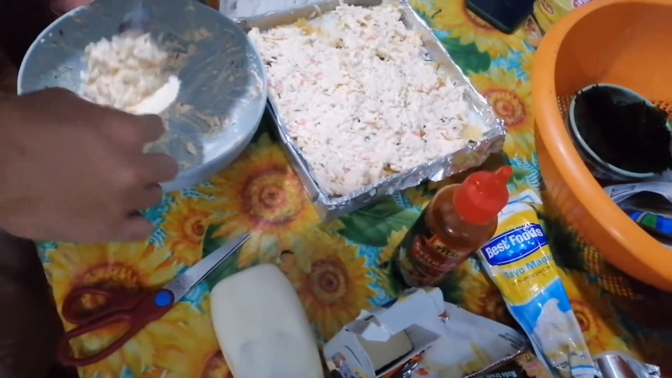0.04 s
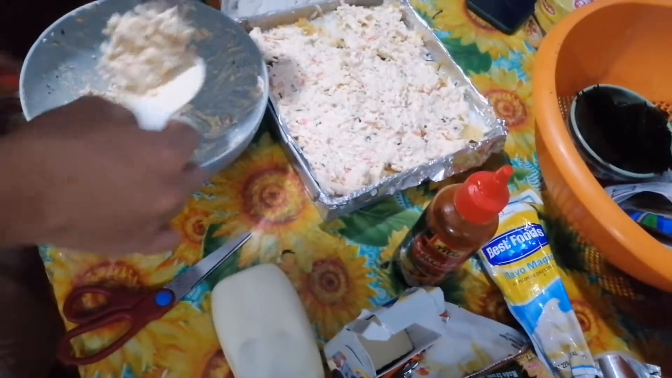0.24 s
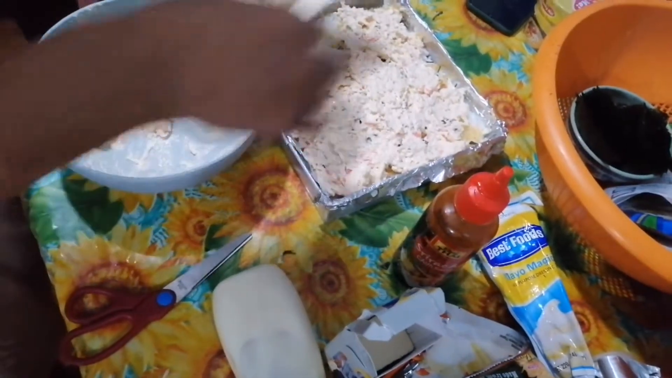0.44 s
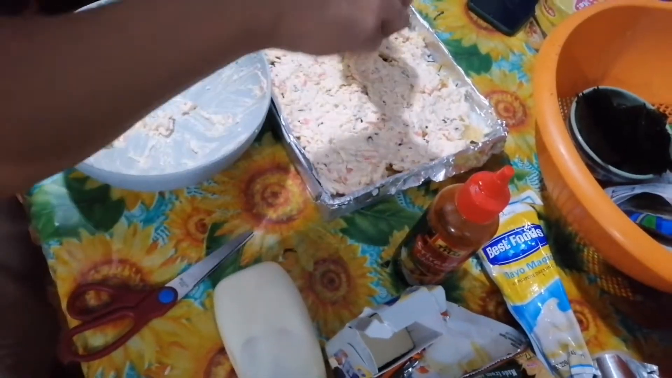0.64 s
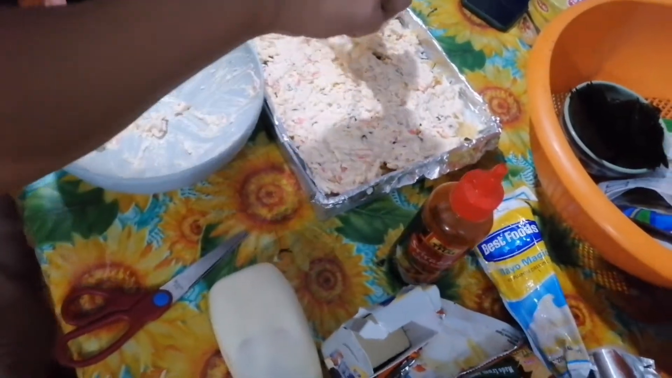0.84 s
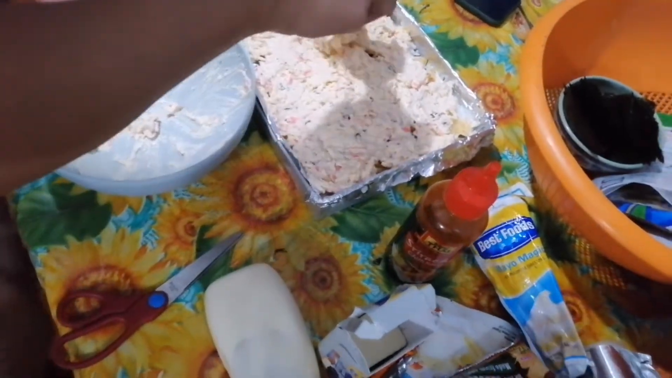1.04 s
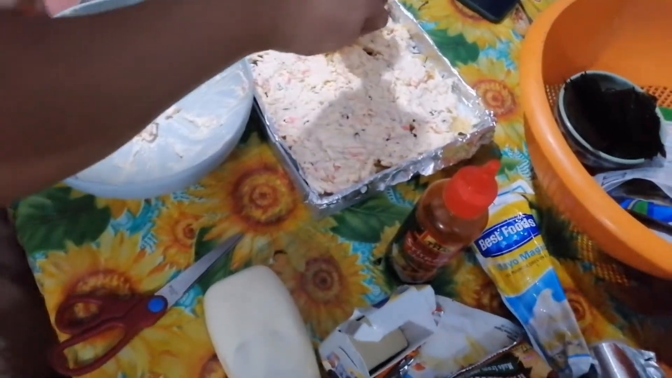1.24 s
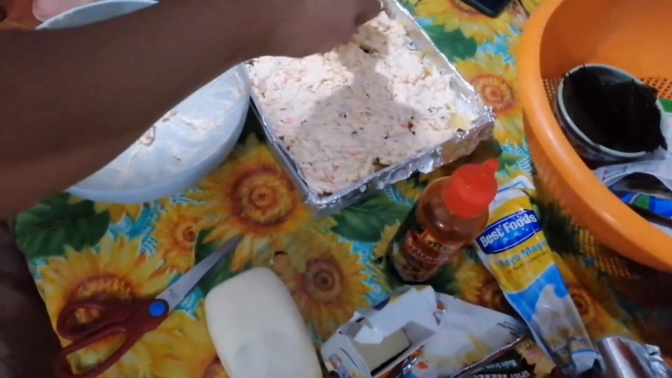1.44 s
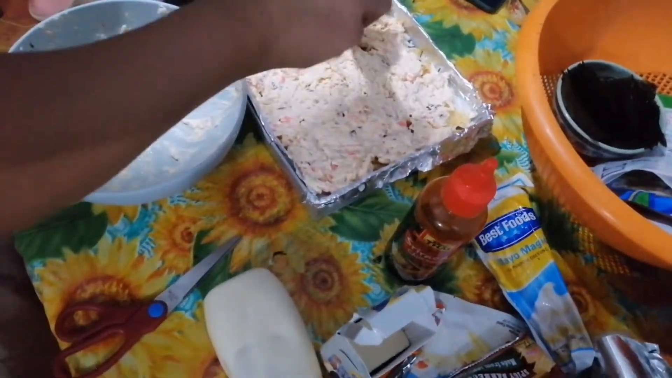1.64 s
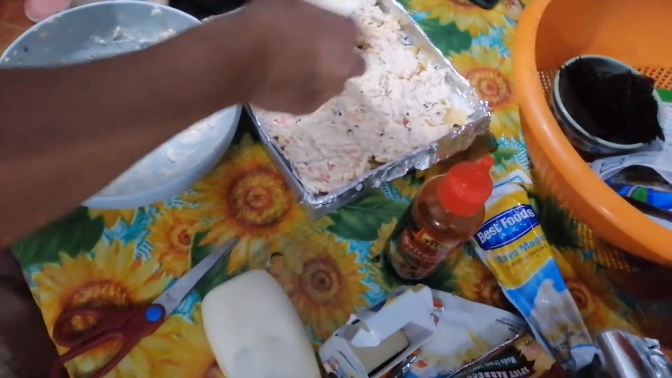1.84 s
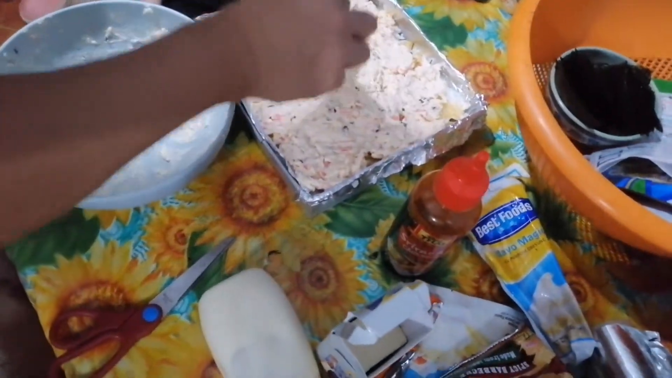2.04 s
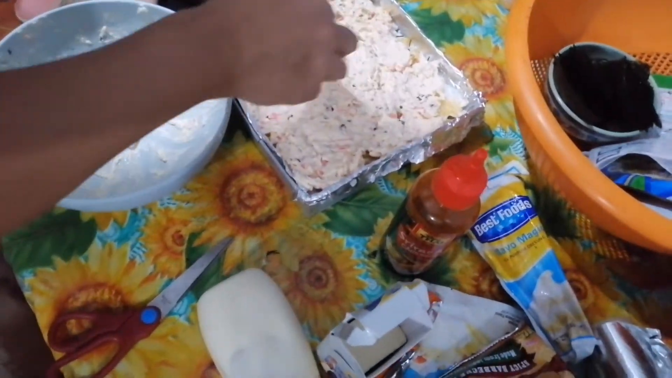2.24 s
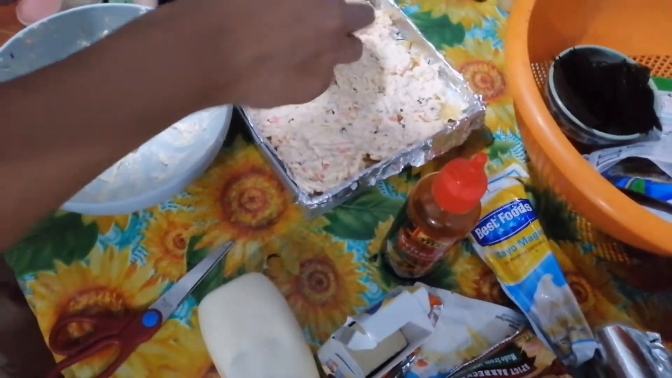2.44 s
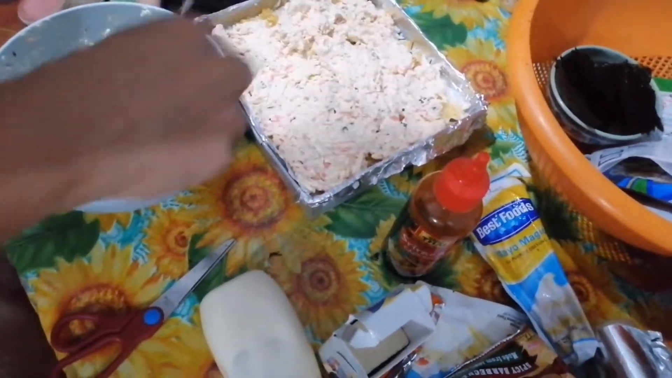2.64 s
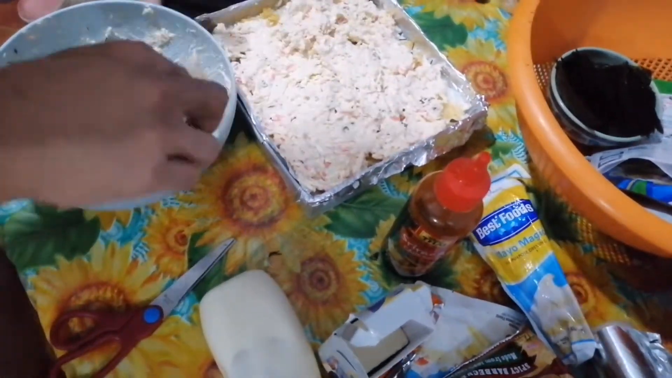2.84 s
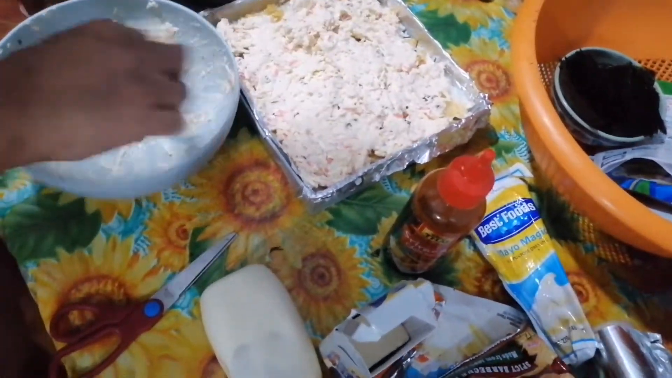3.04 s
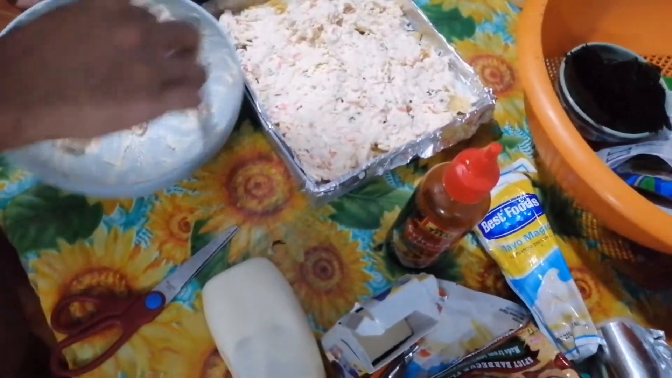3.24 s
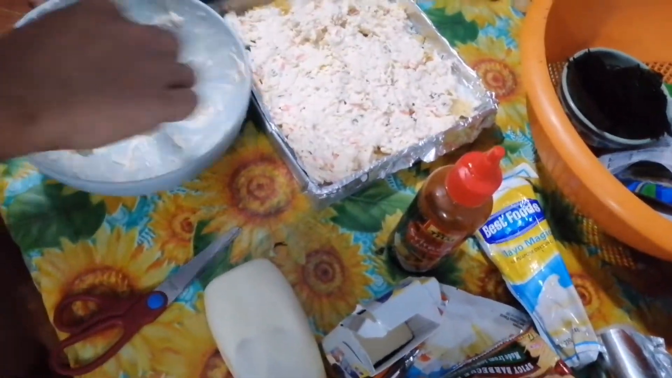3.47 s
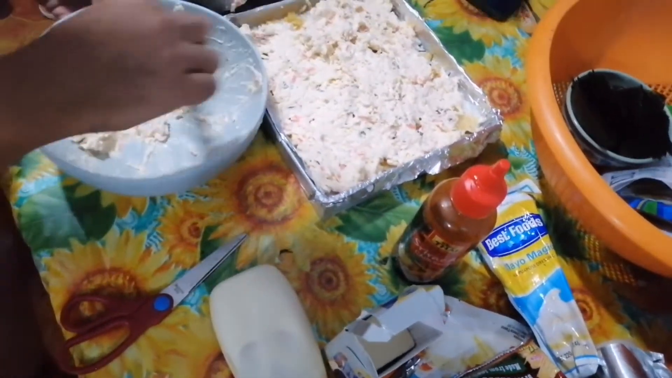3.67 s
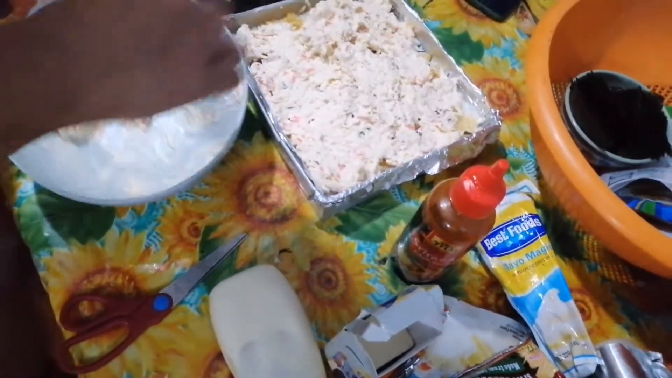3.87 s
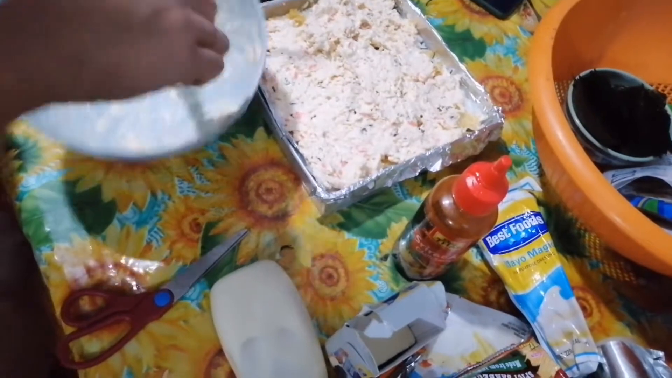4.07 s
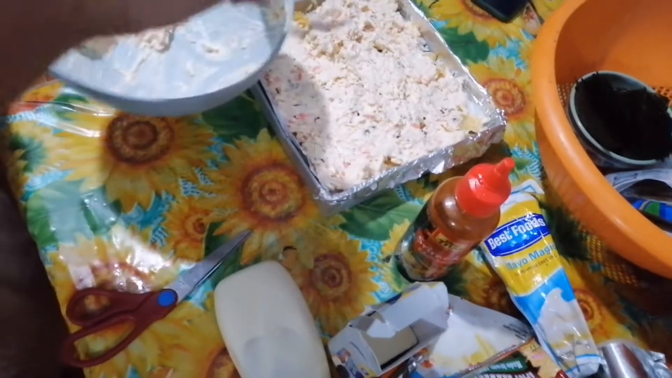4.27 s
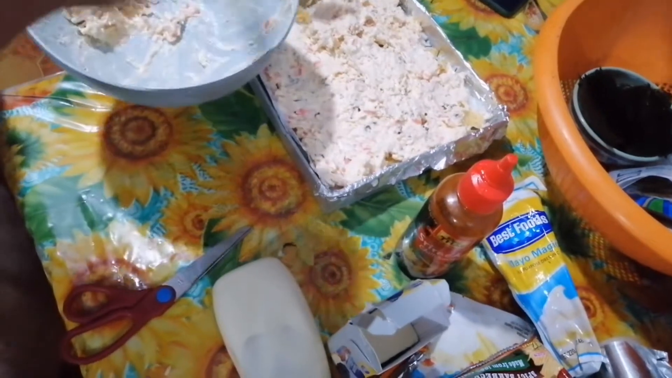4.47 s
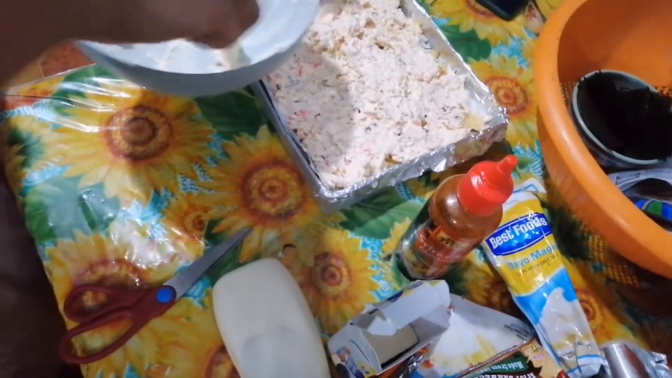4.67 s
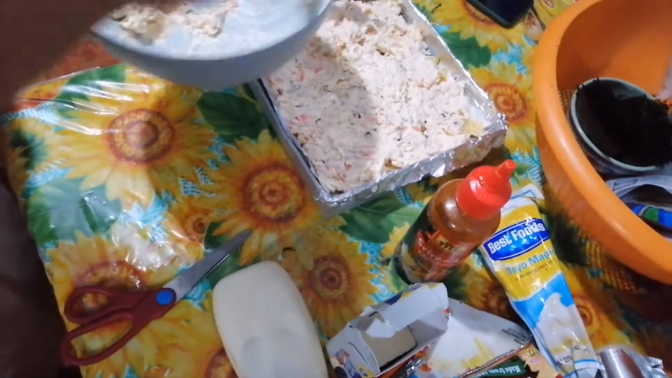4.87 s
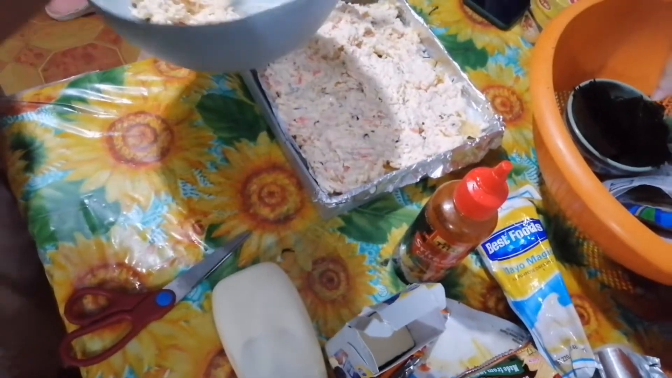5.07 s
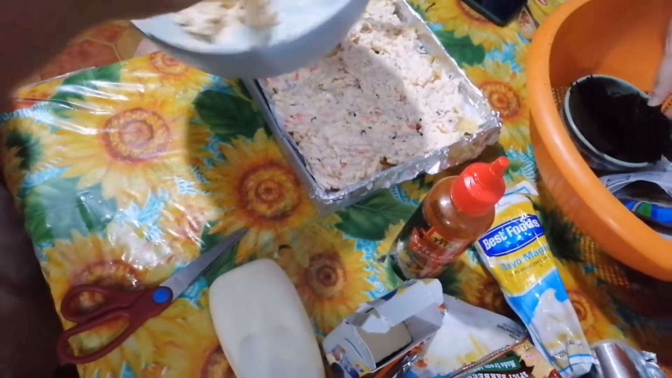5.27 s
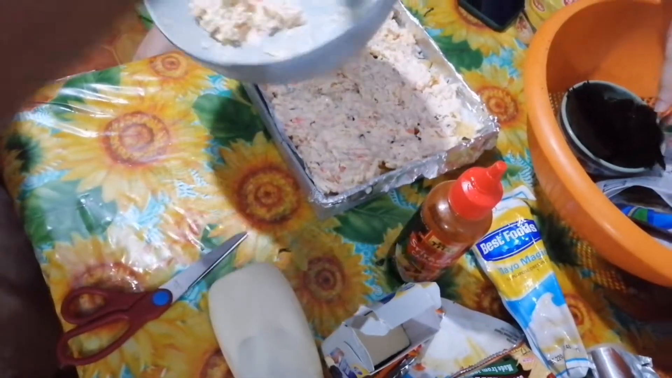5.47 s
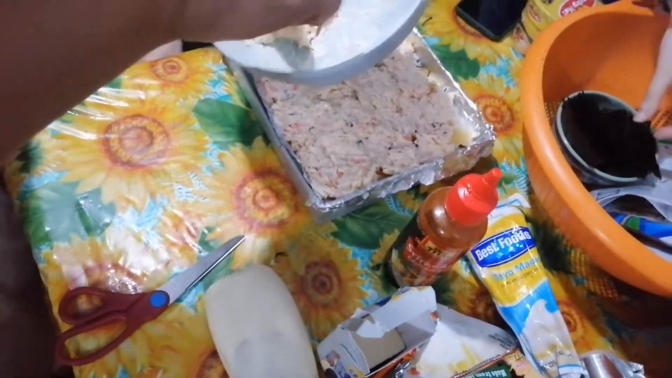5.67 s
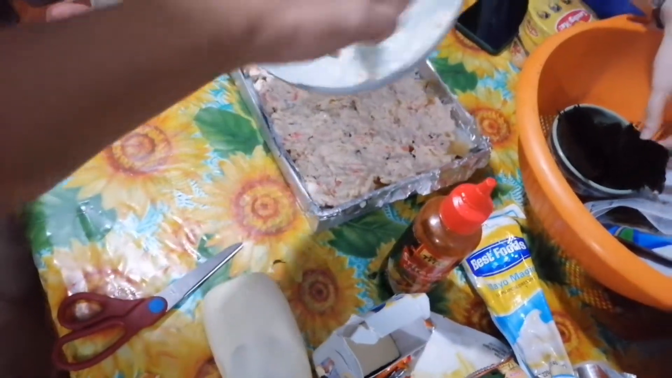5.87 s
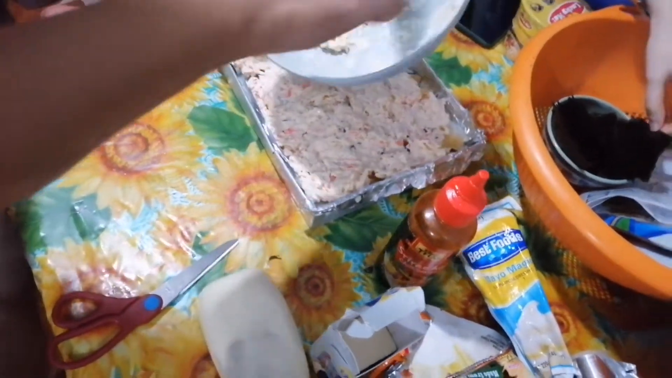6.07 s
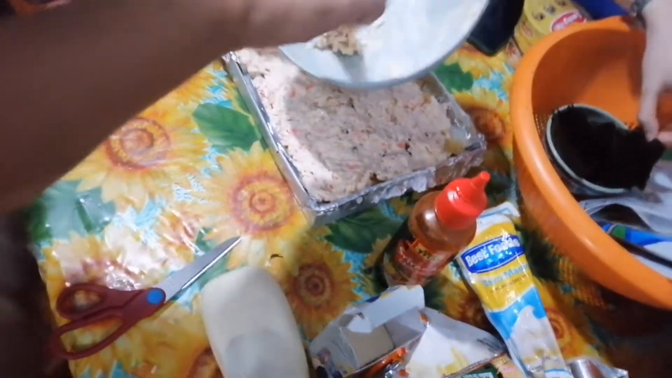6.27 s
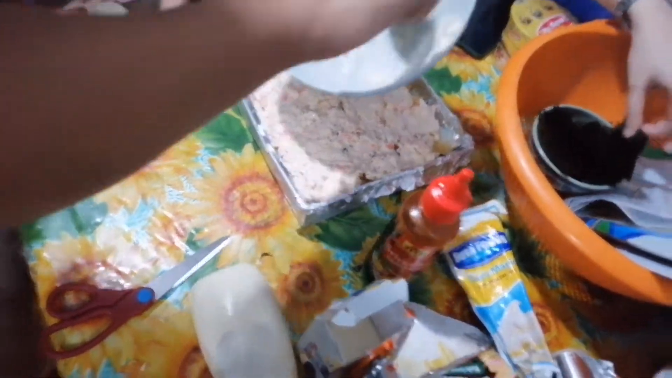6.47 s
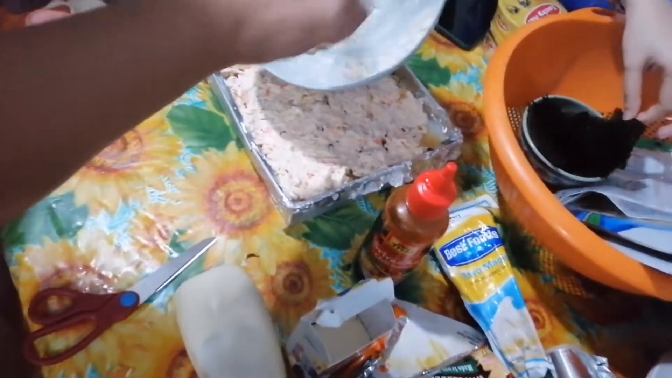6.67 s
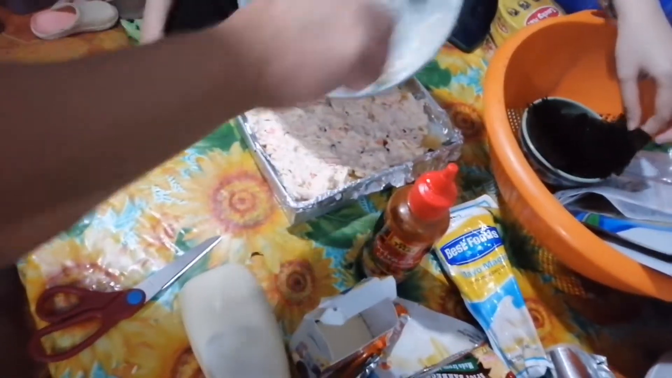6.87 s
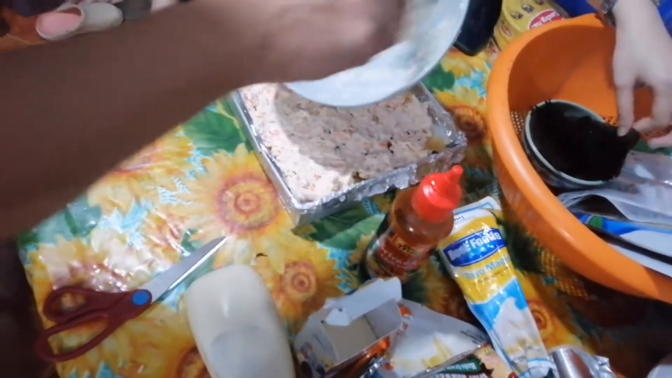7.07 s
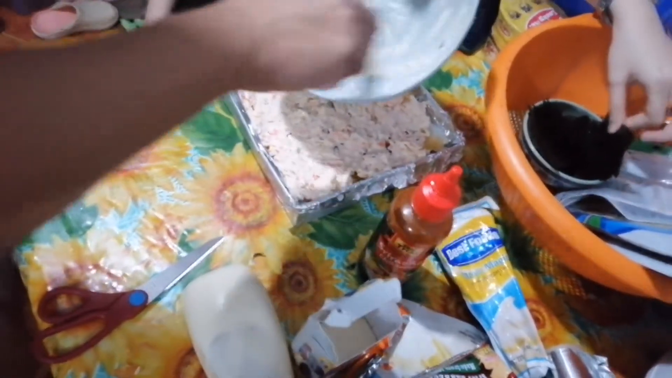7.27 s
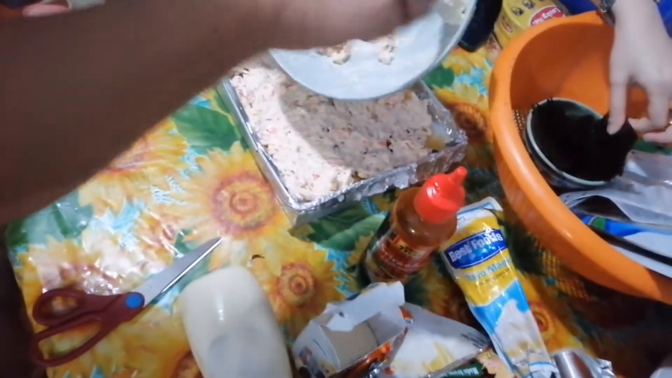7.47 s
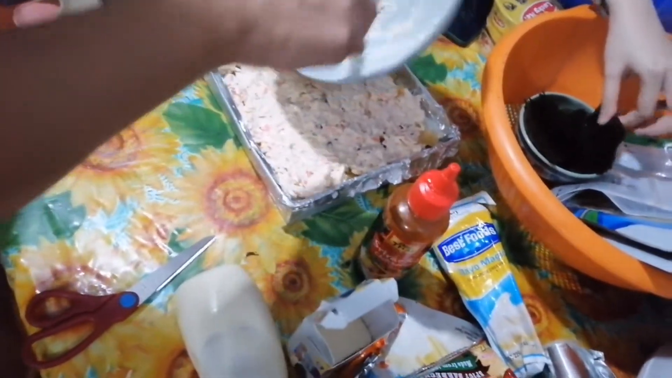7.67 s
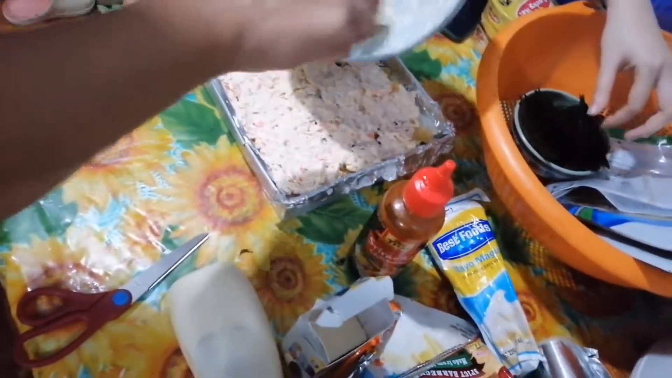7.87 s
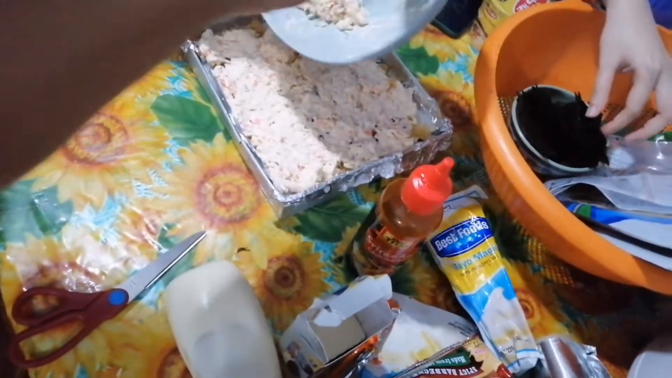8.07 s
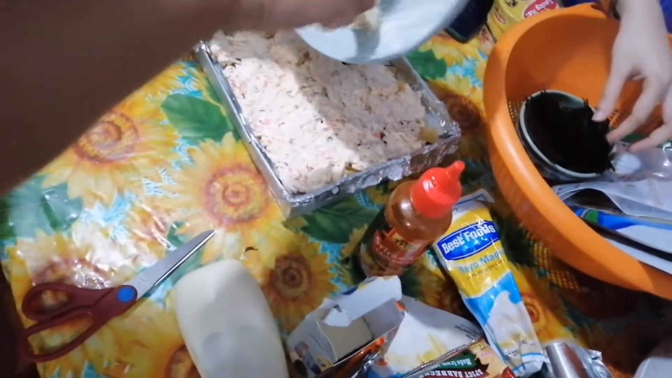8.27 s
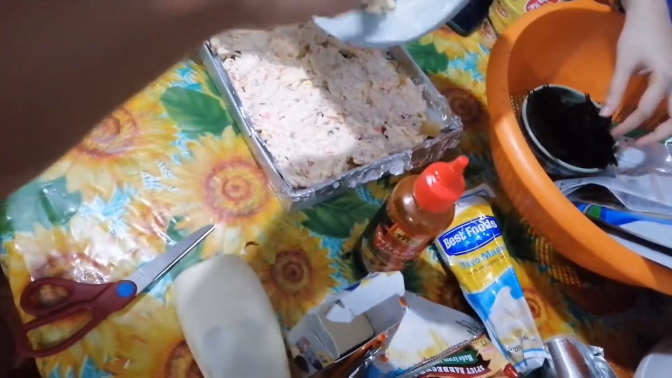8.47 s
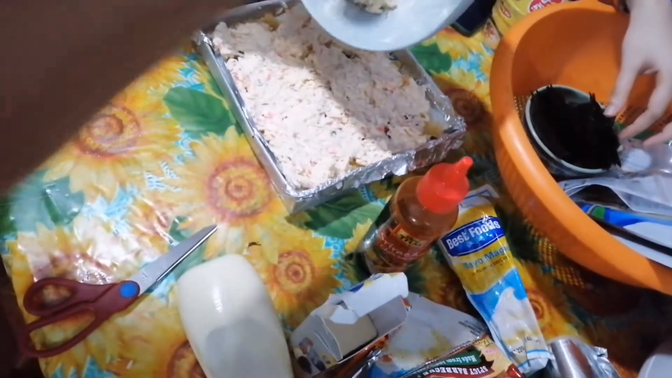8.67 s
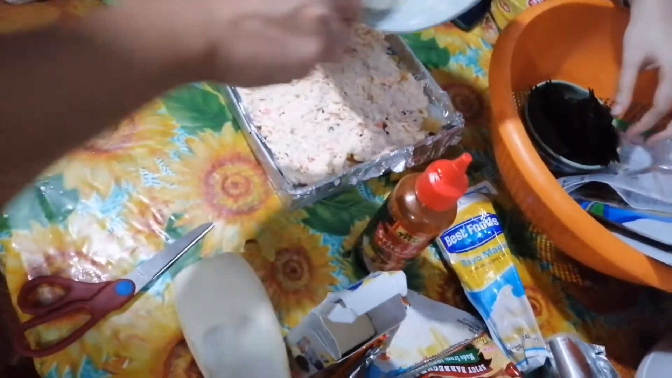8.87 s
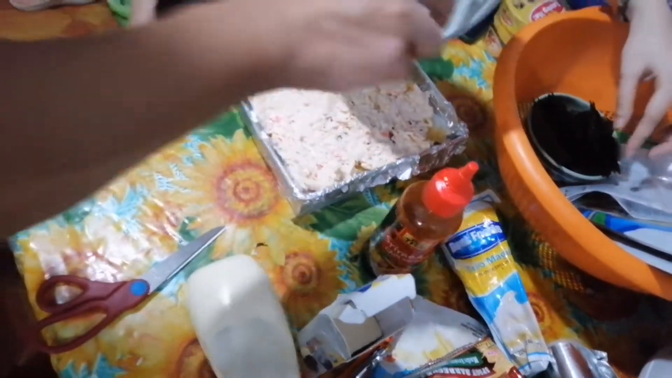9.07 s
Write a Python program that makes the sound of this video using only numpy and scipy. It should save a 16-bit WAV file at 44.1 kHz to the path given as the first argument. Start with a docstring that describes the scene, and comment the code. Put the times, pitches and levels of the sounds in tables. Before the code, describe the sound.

Close in a small kitchen, over faint mains hum and soft room air, a spoon makes barely audible smears and a few damp pats on a filled tray. A couple of light bowl taps follow. After three seconds it scrapes a plastic bowl in short wet strokes, most opening with a tick and ringing the wall. From about five and a half seconds, the scraping is louder and busier, with hollow knocks and tiny squeaks.

```python
"""Soft smears and pats of a spoon spreading creamy topping on rice in a tray are heard first, over a faint
mains hum. The spoon then scrapes a plastic bowl clean: most strokes open with a tick, hiss wetly and make the
bowl ring. Friction noise and sharp blows excite the resonances of bowl and tray; brief gliding tones squeak,
pop and ring. Dull bumps ring the low modes of the table; a small kitchen scatters and reverberates every
contact."""
import sys
import numpy as np
from scipy import signal
from scipy.fft import rfft, irfft
from scipy.io import wavfile

SR = 44100
rng = np.random.default_rng(int(sys.argv[2]) if len(sys.argv) > 2 else 0)


def unload_audio(sound):
    """Save the sound as a 16-bit wav file, at the path given as the first command line argument."""
    columns = np.transpose(np.atleast_2d(sound))
    # keep every value between -1 and 1, then stretch to whole-number steps
    steps = np.round(np.clip(columns, -1, 1) * 32767)
    wavfile.write(sys.argv[1], SR, steps.astype(np.int16))


N = 402191

# Levels of strokes and blows are before the gain_db given in scene(); all levels are before the panning.
# Strokes round the bowl: (time [s], run-up [s], bite after [s], ease-off after [s],
# first glide re hiss [dB], hiss [dB], wall ring [dB], hollow body [dB])
SCRAPE_STROKES = [ (3.019, .047, 0.071, 0.12, -10, -41, -46.5, -54.5),
                  (3.19, 0.039, 0.033, 0.18, 1.5, -59.5, -68, -70),
                  (3.335, 0.1, 0.033, 0.09, -8.5, -35, -42.5, -47.5),
                  (3.662, .11, 0.047, 0.12, -18, -32, -42.5, -52),
                  (4.329, 0.054, 0.097, 0.095, -25.5, -37, -45, -43.5),
                  (4.6, 0.058, 0.12, 0.13, -18, -37.5, -42.5, -48.5),
                  (4.9, 0.071, 0.11, 0.14, -10, -37.5, -37, -42.5),
                  (5.195, 0.12, 0.087, 0.13, -12.5, -35.5, -40.5, -44.5),
                  (5.55, 0.11, 0.086, 0.099, -19, -27, -30.5, -36.5),
                  (5.91, 0.054, 0.032, 0.048, -13, -28.5, -29, -44.5),
                  (6.182, 0.091, 0.066, 0.068, -15, -26, -24, -40),
                  (6.46, 0.1, 0.13, 0.12, -17, -28, -32, -39.5),
                  (6.595, 0.015, 0.013, 0.029, -4, -54, -42.5, -48.5),
                  (6.838, 0.061, 0.12, 0.16, -16, -32.5, -37.5, -47.5),
                  (7.195, 0.064, 0.097, 0.15, -13, -34, -38, -44),
                  (7.515, 0.11, 0.07, 0.1, -8, -31, -39.5, -46.5),
                  (7.822, .062, 0.04, 0.08, -13, -31.5, -33.5, -46),
                  (8.139, 0.043, 0.021, 0.075, -14, -31.5, -36.5, -46),
                  (8.251, 0.047, 0.022, 0.039, -16, -44, -43.5, -41),
                  (8.44, .046, 0.024, 0.058, -24, -29.5, -37, -53),
                  (8.51, 0.025, 0.016, 0.041, -12, -50, -44.5, -43),
                  (8.75, 0.057, 0.13, 0.16, -22, -34, -35, -52.5),
                  (8.919, 0.03, .02, 0.038, -11, -49, -50, -63), ]
# Smears of topping: (time [s], swell [s], fade [s], hiss [dB], wall ring [dB], hollow body [dB])
SMEAR_STROKES = [ (0.005, 0.017, 0.082, -62.5, -54.5, -56.5), (0.233, .02, .07, -58.5, -68, -72),
                 (0.536, .025, 0.13, -48, -47.5, -57.5), (0.581, 0.04, 0.1, -52, -54, -65),
                 (0.849, 0.044, .15, -59.5, -57, -90), (0.955, .075, 0.12, -55.5, -56, -55),
                 (1.37, 0.049, .06, -64, -70, -63), (1.483, 0.0054, 0.048, -64, -72, -47),
                 (1.539, 0.029, 0.063, -51.5, -47, -42.5), (3.494, 0.015, 0.084, -63, -49.5, -46.5), ]
# Spoon striking the bowl: (time [s], overall level [dB],
# tick [dB], wall ring [dB], hollow body [dB], all three re overall level)
BOWL_BLOWS = [(1.905, -23, -10, -12, -34), (2.188, -30, -15.5, -13.5, -25), (3.012, -25, -12, -23.5, -28),
              (3.319, -38.5, -2.5, -17, -18), (3.969, -13.5, -16, -20.5, -32),
              (4.077, -23, -10, -26, -20.5), (4.083, -23.5, -14, -15, -24), (4.582, -20, -14, -36, -27),
              (4.729, -25.5, -13, -27, -8), (4.753, -26, -32, -15, -16), (4.889, -16, -13, -27.5, -34),
              (5.182, -18, -8.5, -23.5, -30), (5.536, -22.5, -9, -20, -25.5),
              (5.903, -14, -14, -10.5, -18.5), (6.05, -43.5, -3, -22, -31), (6.237, -26, -26, -7.5, -16),
              (6.287, -14.5, -13, -15.5, -10), (6.449, -16.5, -12.5, -37, -26), (6.525, -29, -6, -10, -12),
              (6.826, -34.5, -6, -10, -33), (7.18, -20, -7, -38, -38), (7.503, -29, 0, -22, -17),
              (7.572, -15, -14, -7, -18.5), (7.607, -19, -8, -17, -8), (7.811, -21, -11, -17, -19),
              (7.844, -15, -21, -14, -22), (7.868, -25.5, -18, -1.5, -32), (7.895, -27.5, -14, -35, 1),
              (8.127, -20.5, -12, -26, -17), (8.149, -37, -19, 3.5, -25), (8.432, -26, -20.5, -7.5, -20.5),
              (8.499, -37, -8, -13, -22), (8.736, -22.5, -3.5, -25, -30.5)]
# Spoon striking the tray: (time [s], overall level [dB],
# tick [dB], wall ring [dB], hollow body [dB], all three re overall level)
TRAY_BLOWS = [(1.041, -36.5, -28, -7.5, -8), (1.445, -21.5, -17.5, -14.5, -18.5),
              (1.474, -21.5, -16.5, -12, -18.5), (1.564, -20, -18.5, -10, -23),
              (1.577, -24.5, -8.5, -8, -32)]
# Brief gliding tones: squeaks in wet cream, a tiny wet pop and short rings of the bowl: (time [s], length [s],
# first pitch [Hz], last pitch [Hz], level [dB])
GLIDING_TONES = [(1.256, 0.0028, 9340, 12000, -49), (3.346, 0.0028, 6410, 5000, -31.5),
                 (4.686, 0.037, 4200, 3970, -36), (4.95, 0.032, 4250, 4020, -49),
                 (5.006, 0.05, 2290, 2255, -41.5), (5.424, 0.012, 2220, 2200, -51),
                 (6.188, 0.049, 790, 757, -43), (5.953, 0.03, 1244, 1237, -41.5),
                 (6.231, 0.056, 2606, 2440, -32), (6.48, 0.049, 4235, 3900, -37),
                 (6.541, 0.0352, 2552, 2298, -31), (6.587, 0.075, 1424, 1108, -41),
                 (7.314, 0.047, 1300, 1197, -44.5), (7.859, 0.017, 2333, 2300, -33),
                 (8.803, 0.019, 4220, 3800, -50), (8.878, 0.03, 1417, 1385, -43),
                 (8.914, 0.0537, 1342, 1206, -46.5)]
# Dull bumps on the table: (time [s], level [dB], pitch [Hz])
TABLE_BUMPS = [(1.358, -43.5, 178), (1.392, -46, 171), (3.194, -30.5, 146.5), (3.213, -33.5, 149),
               (3.297, -39.5, 153), (3.319, -42, 144), (3.5, -45, 143), (3.59, -48, 155), (5.633, -48, 340),
               (5.903, -45, 281), (6.523, -39.5, 347), (6.823, -38, 333), (7.573, -44, 215),
               (7.895, -48, 307), (8.501, -45, 204)]
# Table modes: (multiple of the pitch [1], level [dB], decay by 60 dB [periods of the pitch])
TABLE_MODES = [(0.541, -7.5, 31), (1, 3, 16), (1.36, -8.5, 28), (2.1, -14, 20)]
# Bowl modes, weighted by the grip: (frequency [Hz], width [Hz],
# level resting on the table [dB], level lifted [dB], level tipped over the tray [dB])
BOWL_RESONANCES = [(346, 110, 0, -1, 0.5), (646, 67, -32, 12.5, 6), (725, 73, 2, -8, 8),
                   (829, 68, -10, 6, 7.5), (1260, 52, -6, 5, 10.5), (1453, 48, 7.5, 7, 5),
                   (1717, 115, -17, -6, 0), (2046, 68, 6, 8, 0), (2290, 62, -22, -4, 6),
                   (2635, 340, -19, 0.5, -4.5), (3900, 660, 11.5, 7.5, 0.5), (4560, 750, 6.5, -18, -5),
                   (5580, 690, 6.5, 3.5, -4.5), (7320, 880, -2, -4.5, -11), (9650, 850, -3.5, -4.5, -14.5),
                   (11400, 2000, -3.5, -7.5, -16.5)]
# Dead response of the filled tray: (frequency [Hz], level [dB])
TRAY_RESPONSE = [(100, -6), (280, 10), (700, 3.5), (1200, 4), (1700, 10.5), (2400, 7.5), (4000, 0.5),
                 (6000, -1.5), (8500, -9), (11000, -5.5), (15000, -21)]
# Colour of the spoon's contact: (frequency [Hz], level [dB])
CONTACT_RESPONSE = [(60, -12), (250, -8), (480, -8), (620, -1.5), (1020, 0), (4000, 8), (8200, 7),
                    (11500, 6.5), (14000, 3.5), (16000, -19)]
# Bright tick of the spoon's edge: (frequency [Hz], level [dB])
EDGE_RESPONSE = [(2000, 13.5), (3000, 0.5), (4000, -1.5), (5500, -4.5), (8000, -7.5), (10500, -5.5),
                 (13000, -12), (15500, -16)]
# Position of the spoon: (time [s], left minus right level [dB])
SPOON_PAN = [(0, -2), (2, -1.5), (3.2, 0.5), (5.2, -1.5), (6, -2), (7.2, -1), (8.2, -1.5), (9, -4.5)]
# Mains hum: (frequency [Hz], left level [dB], right level [dB])
HUM_TONES = [(59.3, -57.5, -51), (225, -98, -76), (244.4, -96, -77), (297.2, -63, -67.5)]
# Spectrum of the room air: (frequency [Hz], relative density [dB per Hz])
AIR_SPECTRUM = [(20, -3.5), (60, -5.5), (100, -5.5), (200, -8.5), (420, -14.5), (800, -16), (1600, -21.5),
                (2400, -21.5), (3500, -26.5), (6000, -31.5), (12000, -38.5), (14500, -42), (16000, -56)]
# Likeness of the two channels of room air: (frequency [Hz], coherence [0-1])
AIR_COHERENCE = [(50, 1), (300, 0.57), (900, 0), (2000, 0), (8000, 0)]
# Times at which the bowl is lifted, then tipped: (time [s])
GRIP_TIMES = [4.25, 5.8]
# Muffling by cream under the edge before the bite: (wall ring [dB], hollow body [dB])
CUSHION_LEVELS = (-13.5, -12)
# Decay as the hand eases off: (hiss [dB/s], wall ring [dB/s], hollow body [dB/s])
RELEASE_RATES = (408, 398, 304)

AIR_DB = -62
BODY_TOP_HZ, WALL_TOP_HZ = 1050, 3000
EDGE_HZ = 15900  # upper band limit of the whole scene
TAPS = 4096  # length of the responses and of the random sequences [samples]
RISE_SHARE = 0.43  # the spoon gathers speed over this last share of its run-up
BITE_S = 0.046  # time the edge takes to cut through the cream to the wall
SLOW_RING_DB = -6  # the bowl rings less while the spoon is slow
BRAKE_DB_PER_S = 78  # pressing brakes the spoon, so the hiss sags
RELEASE_S = 0.0855
SMEAR_FIRST_DB, SMEAR_LAST_DB = -17.5, -21  # as the spoon sinks in and as it leaves, re the top
RIM_HZ, RIM_T60_S, RIM_DB = 2290, 0.052, -2.5  # level re the wall ring


def amp(db):
    """Logarithmic level: decibels become an amplitude ratio."""
    return 10 ** (np.asarray(db) / 20)


def evened(x):
    """Power normalization: scales to an rms of 1."""
    return x / np.sqrt(np.mean(x ** 2) + 1e-20)


def unit(x):
    """Energy normalization: scales each channel to an energy of 1."""
    return x / np.sqrt(np.sum(x ** 2, axis=-1, keepdims=True) + 1e-20)


def read(points, hz):
    """Spectral interpolation: reads a table on a log-frequency axis."""
    f, value = np.transpose(points)
    return np.interp(np.log(hz + 1), np.log(f + 1), value)


def add(mix, s, sound):
    """Superposition: adds a stereo sound from time s onward."""
    part = mix[:, max(round(s * SR), 0):][:, :sound.shape[1]]
    part += sound[:, :part.shape[1]]


def wobble(n, rate_hz):
    """Random modulation: joins rate_hz random values a second by straight lines, at rms 1."""
    at = np.arange(n) * rate_hz / SR
    return evened(np.interp(at, np.arange(TAPS), rng.standard_normal(TAPS)))


def hum():
    """Periodic vibration: mains tones waver slightly in phase and level."""
    t = np.arange(N) / SR
    out = np.zeros((2, N))
    for hz, left_db, right_db in HUM_TONES:
        phase = 2 * np.pi * (hz * t + rng.random()) + 0.06 * wobble(N, 3)
        tone = np.sin(phase) * amp(0.35 * wobble(N, 4))
        out += amp([[left_db], [right_db]]) * evened(tone)
    return out


def air():
    """Partial coherence: dull room noise is nearly mono in the bass and independent above."""
    hz = np.fft.rfftfreq(N, 1 / SR)
    left, other = rfft(rng.standard_normal((2, N)))
    same = np.clip(read(AIR_COHERENCE, hz), 0, 1)
    right = same * left + np.sqrt(1 - same ** 2) * other
    spectrum = np.array([left, right]) * amp(read(AIR_SPECTRUM, hz))
    return amp(AIR_DB) * evened(irfft(spectrum, N)) * amp(0.7 * wobble(N, 25))


def kitchen(x, s, room_db, scatter_s=0.00088, scatter_hz=2100, low_t60=0.17, high_t60=0.24):
    """Scattering and reverberation: lows reach both ears alike, highs scatter off dishes, a tail follows."""
    t = np.arange(SR // 5) / SR
    scatter, tail = rng.standard_normal((2, 2, len(t)))
    low, high = (signal.butter(1, scatter_hz, kind, fs=SR) for kind in ("low", "high"))
    near = signal.lfilter(*low, 1. * (t == 0))
    near = near + signal.lfilter(*high, unit(scatter * np.exp(-t / scatter_s)))
    tail = tail * (1 - np.exp(-t / 0.00014))
    far = signal.lfilter(*low, unit(tail * amp(-60 * t / low_t60)))
    far = far + signal.lfilter(*high, unit(tail * amp(-60 * t / high_t60)))
    response = unit(near) + amp(room_db) * far
    pan_db = np.interp(s, *np.transpose(SPOON_PAN))
    return signal.fftconvolve(x[None], response, axes=1) * amp([[pan_db / 2], [-pan_db / 2]])


def travelling(x, s, room_db, size=2048):
    """Changing reflection paths: overlapping pieces of a moving source each get their own scatter."""
    out = np.zeros((2, len(x) + SR // 5))
    for start in range(0, len(x), size // 2):
        piece = x[start:start + size]
        piece = piece * signal.windows.cosine(size)[:len(piece)]
        add(out, start / SR, kitchen(piece, s, room_db))
    return out


def bump(row, rise_s=0.0018):
    """Modal decay: a soft push swings the low table modes; higher bumps die sooner."""
    s, db, hz = row
    t = np.arange(SR // 4) / SR
    ring = 0
    for multiple, mode_db, periods in TABLE_MODES:
        ring = ring + amp(mode_db - 60 * t * hz / periods) * np.sin(2 * np.pi * multiple * hz * t)
    ring = ring * (1 - np.exp(-t / rise_s))
    return s, amp(db) * kitchen(ring, s, room_db=-8, scatter_hz=5000)


def causal(gain):
    """Minimum phase: the promptest impulse response with this magnitude."""
    both_sides = np.r_[gain, gain[-2:0:-1]]
    log_gain = np.log(np.maximum(both_sides, gain.max() * 1e-5))
    return np.fft.ifft(np.exp(np.conj(signal.hilbert(log_gain)))).real


def registers(gain):
    """Band division: splits a response into hiss, wall ring and hollow body, each of energy 1."""
    hz = np.fft.rfftfreq(TAPS, 1 / SR)
    below_wall, below_body = (1 / (1 + (hz / top) ** 12) for top in (WALL_TOP_HZ, BODY_TOP_HZ))
    power_shares = 1 - below_wall, below_wall * (1 - below_body), below_body
    coloured = gain * amp(read(CONTACT_RESPONSE, hz))
    return np.array([unit(causal(coloured * np.sqrt(share))) for share in power_shares])


def vessels():
    """Resonance: summed mode powers give the bowl in each grip; smooth spectra give tray and spoon edge."""
    hz = np.fft.rfftfreq(TAPS, 1 / SR)
    powers = 0
    for f, width, *grip_db in BOWL_RESONANCES:
        powers = powers + amp(grip_db)[:, None] ** 2 / (1 + (2 * (hz - f) / width) ** 2)
    bowls = [registers(np.sqrt(power)) for power in powers]
    tray = registers(amp(read(TRAY_RESPONSE, hz)))
    edge = registers(amp(read(EDGE_RESPONSE, hz)))[0]
    return bowls, tray, edge


def hit(row, vessel, edge, gain_db, scatter_s, rattle_db=-1, high_modes_db=-4):
    """Impulse excitation: a sharp blow cracks and rattles at the edge and rings the wall and body."""
    s, level_db, tick_db, wall_db, body_db = row
    high_modes, wall, body = vessel
    crack = kitchen(amp(tick_db) * edge, s, room_db=-9.5, scatter_s=0.0037, scatter_hz=900)
    rattle = amp(tick_db + rattle_db) * (edge + amp(high_modes_db) * high_modes)
    rattle = kitchen(rattle, s, room_db=-1.5, scatter_s=scatter_s, scatter_hz=850)
    ring = kitchen(amp(wall_db) * wall + amp(body_db) * body, s, room_db=-0.5, scatter_hz=2220)
    return s, amp(level_db + gain_db) * (crack / np.sqrt(2) + rattle / 2 + ring)


def rim(row):
    """Free vibration: a knock on the wall sets the bowl's rim ringing for a moment."""
    s, level_db, _, wall_db, _ = row
    t = np.arange(0, RIM_T60_S, 1 / SR)
    decay = amp(level_db + wall_db + RIM_DB - 60 * t / RIM_T60_S)
    return s, kitchen(decay * np.sin(2 * np.pi * RIM_HZ * t), s, room_db=-12, scatter_hz=6000)


def gliding_tone(row, width_hz=170):
    """Narrow-band tone: narrow noise forms a fuzzy whistle gliding between two pitches."""
    s, length, first_hz, last_hz, db = row
    n = round(length * SR)
    pole = np.exp(-np.pi * width_hz / SR)
    noise = rng.standard_normal((TAPS, 2)) @ [1, 1j]
    fuzz = signal.lfilter([1 - pole], [1, -pole], noise)
    phase = 2 * np.pi * np.cumsum(np.geomspace(first_hz, last_hz, n)) / SR
    tone = (np.resize(fuzz, n) * np.exp(1j * phase)).real
    whistle = amp(db) * evened(tone) * signal.windows.tukey(n, 0.5)
    return s, kitchen(whistle, s, room_db=-9, scatter_s=0.0004)


def stroke(start, levels_db, vessel, gain_db, slips_per_s, smooth, judder_db, judder_hz,
           first_fizz_db=9.0, last_fizz_db=-1.0, fizz_hz=6000):
    """Friction excitation: tiny slips and bursting films of cream drive the vessel under varying pressure."""
    n = levels_db.shape[1]
    size, film = rng.standard_normal((2, SR // 2))[:, :n]
    slips = size * (rng.random(SR // 2)[:n] < slips_per_s / SR)
    smooth = np.clip(smooth, 0, 1)
    friction = np.sqrt(1 - smooth) * evened(slips) + np.sqrt(smooth) * film
    friction = evened(friction * amp(judder_db * wobble(n, judder_hz)))
    friction = friction * signal.windows.tukey(n, 0.05)
    # cream piles up before the edge, so the fizz dulls along the stroke
    fizz = signal.filtfilt(*signal.butter(2, fizz_hz, "high", fs=SR), friction)
    friction = friction + fizz * (amp(np.linspace(first_fizz_db, last_fizz_db, n)) - 1)
    hiss, wall, body = (signal.fftconvolve(friction * amp(db), ring)
                        for db, ring in zip(levels_db, vessel))
    sound = travelling(hiss[:n], start, room_db=-6.5)
    add(sound, 0, kitchen(wall + body, start, room_db=-6.0, low_t60=0.2))
    return start, amp(gain_db) * sound


def smear_levels(row):
    """Viscous contact: the spoon sinks into the topping and slides out in one swell and fade."""
    start, swell, fade, *tops_db = row
    t = np.arange(0, swell + fade, 1 / SR)[:SR // 2]
    shape_db = np.interp(t, [0, swell, swell + fade], [SMEAR_FIRST_DB, 0, SMEAR_LAST_DB])
    return start, np.add.outer(tops_db, shape_db)


def scrape_levels(row):
    """Speed and pressure: the spoon glides, speeds up, bites through to ring the wall, and eases off."""
    start, run_up, bite, ease, glide_db, hiss_db, wall_db, body_db = row
    t = np.arange(0, ease + RELEASE_S, 1 / SR)[:SR // 2]
    slow = np.clip((run_up - t) / (RISE_SHARE * run_up), 0, 1)
    cushioned = np.clip((bite - t) / BITE_S, 0, 1)
    brake_db = BRAKE_DB_PER_S * np.maximum(t - max(bite, run_up), 0)
    hiss = hiss_db + glide_db * slow - brake_db
    rings = [db + SLOW_RING_DB * slow + muffle_db * cushioned
             for db, muffle_db in zip((wall_db, body_db), CUSHION_LEVELS)]
    release_db = np.outer(RELEASE_RATES, np.maximum(t - ease, 0))
    return start, np.array([hiss, *rings]) - release_db


def scene():
    """Superposition of sources: hum and air, then table, tray, and the spoon in the bowl."""
    bowls, tray, edge = vessels()
    mix = hum() + air()
    for row in TABLE_BUMPS:
        add(mix, *bump(row))
    for row in SMEAR_STROKES:
        add(mix, *stroke(*smear_levels(row), tray, gain_db=-3.5, slips_per_s=1100, smooth=0.68,
                         judder_db=0, judder_hz=131))
    for row in TRAY_BLOWS:
        add(mix, *hit(row, tray, tray[0], gain_db=17.5, scatter_s=0.003))
    for row in GLIDING_TONES:
        add(mix, *gliding_tone(row))
    for row in BOWL_BLOWS:
        bowl = bowls[np.searchsorted(GRIP_TIMES, row[0])]
        add(mix, *hit(row, bowl, edge, gain_db=20.5, scatter_s=0.005))
        add(mix, *rim(row))
    for row in SCRAPE_STROKES:
        bowl = bowls[np.searchsorted(GRIP_TIMES, row[0])]
        add(mix, *stroke(*scrape_levels(row), bowl, gain_db=-4.5, slips_per_s=1400, smooth=0.9,
                         judder_db=1.5, judder_hz=159.2))
    return mix


def record(dry):
    """Band limitation: a linear-phase low-pass filter removes the extreme treble."""
    lowpass = signal.firwin(255, EDGE_HZ, window=("kaiser", 8), fs=SR)
    return signal.oaconvolve(dry, lowpass[None], "same")


dry = scene()
out = record(dry)
unload_audio(out)
```